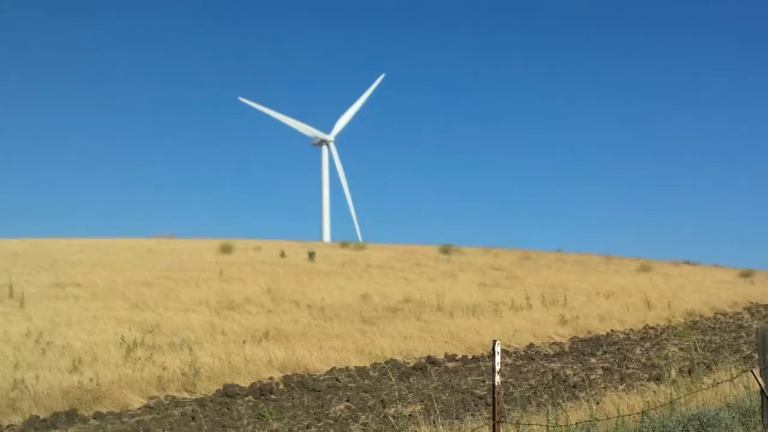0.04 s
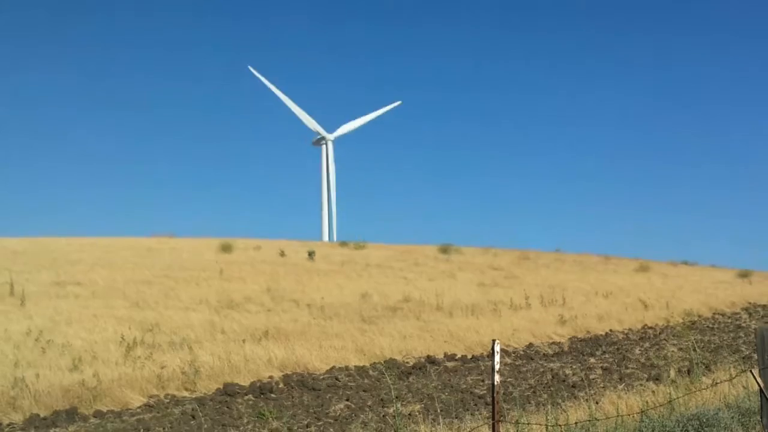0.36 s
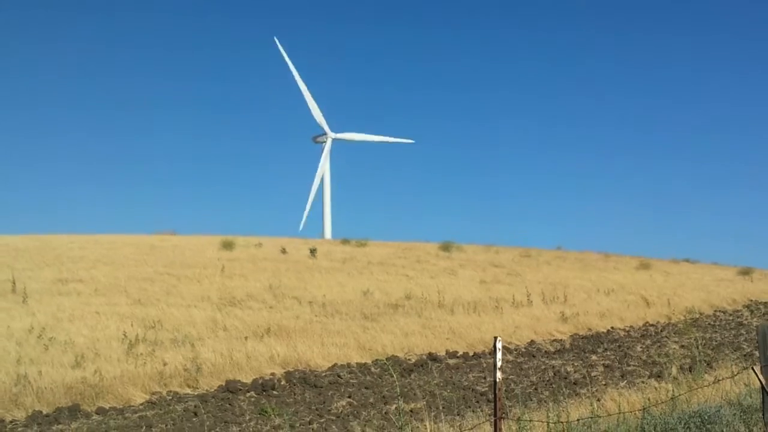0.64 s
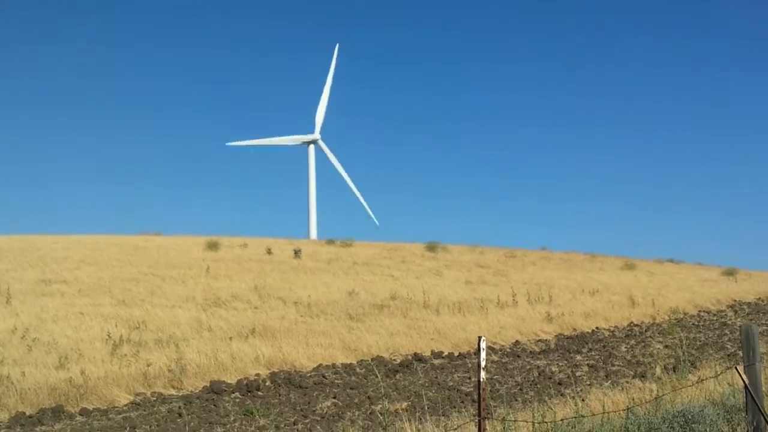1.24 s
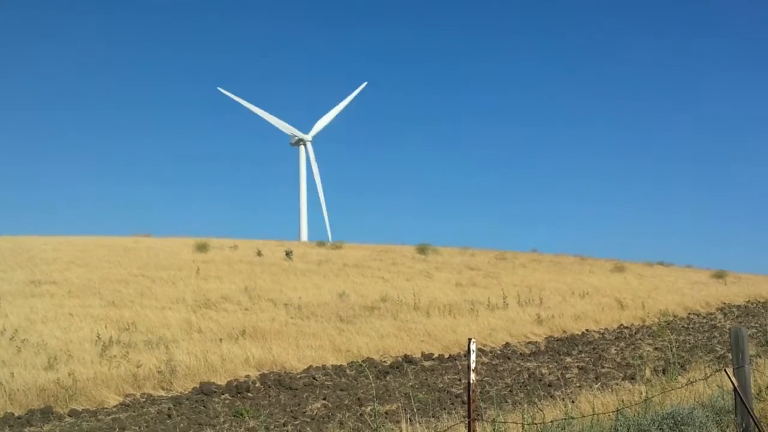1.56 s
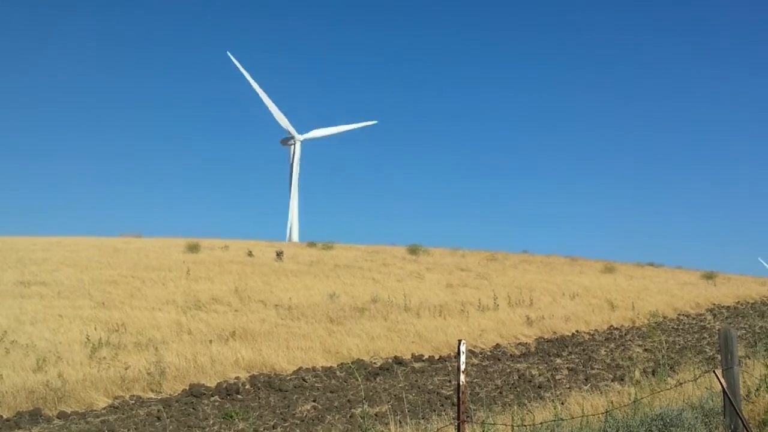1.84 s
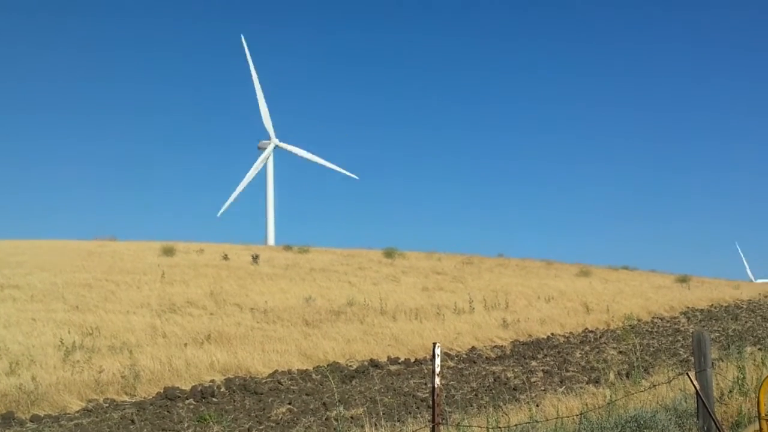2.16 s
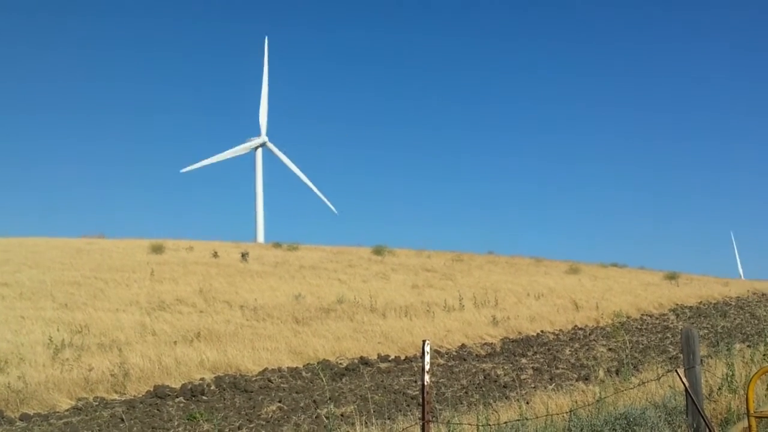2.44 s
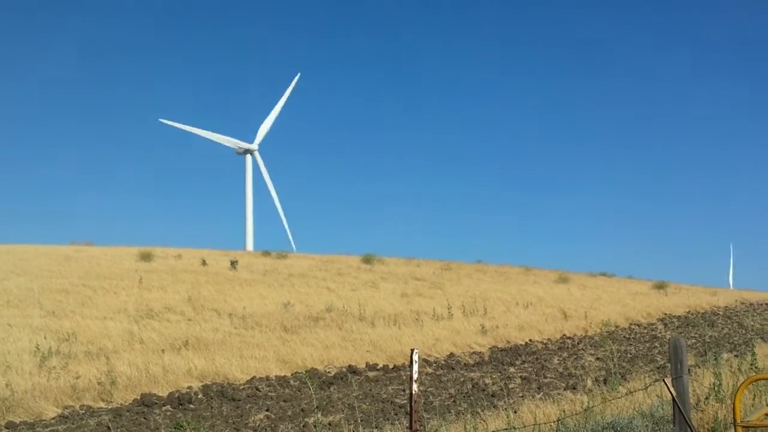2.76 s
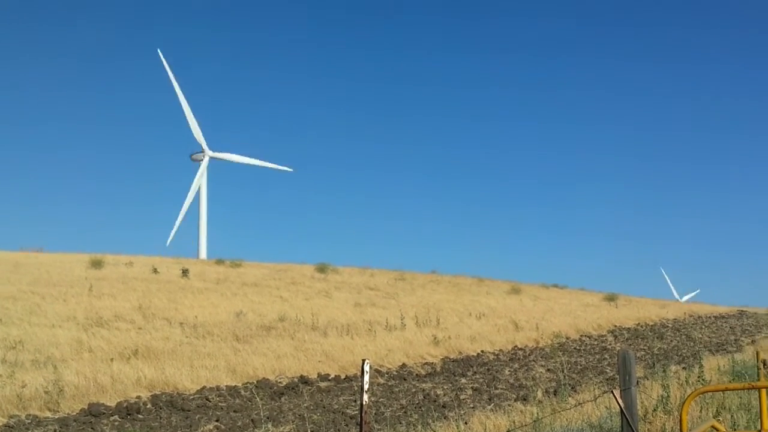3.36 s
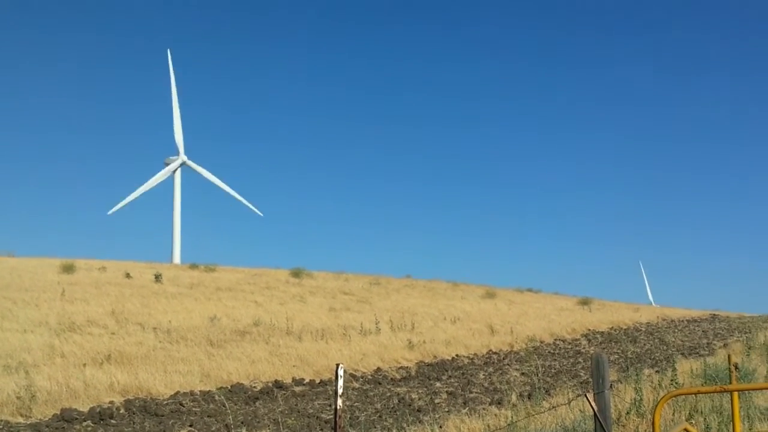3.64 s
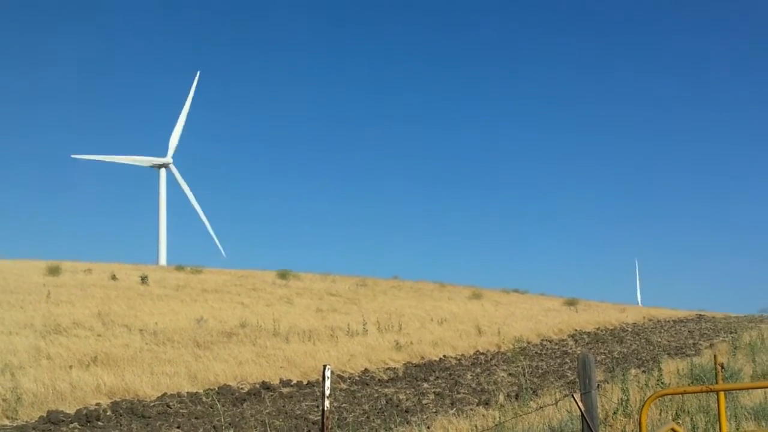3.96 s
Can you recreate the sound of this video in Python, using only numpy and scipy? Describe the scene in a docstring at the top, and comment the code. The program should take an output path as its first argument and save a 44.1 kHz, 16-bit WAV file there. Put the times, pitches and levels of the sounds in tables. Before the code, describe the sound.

Wind rumbles against the microphone in irregular gusts, with occasional sharp bumps.

```python
"""A dull, gusty rumble cuts in, drops out for an instant with a click, then stays: wind on an open
hillside, blowing across the two ports of a hand-held microphone. Each port has its own turbulence,
which grows louder and brighter with every buffet until it overloads the input and crackles. Slow eddies
swell the low end, a few sharp knocks sound in the wind, and a faint steady hiss lies underneath."""
import sys
import numpy as np
from scipy import signal
from scipy.fft import rfft, irfft
from scipy.io import wavfile
from scipy.ndimage import uniform_filter1d

SR = 44100
rng = np.random.default_rng(int(sys.argv[2]) if len(sys.argv) > 2 else 0)


def to_wav(s):
    """Save 16-bit WAV."""
    ch = np.atleast_2d(s).T  # columns
    pcm = np.round(np.clip(ch, -1, 1) * 32767)  # PCM
    wavfile.write(sys.argv[1], SR, pcm.astype(np.int16))


N = 176400

# The wind bed between buffets. Each row: time in seconds, left and right strength in dB.
WIND_BED = [(0.101,-20,-20.5), (0.221,-13,-6.5), (0.35,-15.5,-13.5), (0.6,-10.5,-17), (0.8,-12.5,-10.5),
            (0.971,-30,-13.5), (1.08,-19,-4.5), (1.2,-10.5,-4.5), (1.299,-24,-21), (1.45,-19,-16.5),
            (1.598,-7,-18), (1.742,-19.5,-20.5), (1.899,-6.5,-19.5), (2.05,-14,-20), (2.3,-16.5,-13),
            (2.45,-11,-18), (2.66,-28,-24), (2.802,-21.5,-5.5), (2.95,-10.5,-11.5), (3.101,-15,-11.5),
            (3.301,-4.5,-2.5), (3.429,-24.5,-22.5), (3.53,-18.5,-17), (3.68,-12.5,-11.5),
            (3.801,-17.5,-11.5), (4.0,-14.5,-26)]
# Eddies that hit the ports on top of that bed.
# Each row: centre in seconds, length in seconds, left and right boost in dB (negative for a lull).
BUFFET_EDDIES = [ (.118,0.023,13.5,5), (.182,0.036,11,14), (.249,0.036,-1,16.5), (.294,0.032,5,4.5),
                 (.42,0.048,8.5,3), (.474,0.01,6,7.5), (.503,0.063,1.5,1.5), (.555,0.022,6,-5),
                 (.575,0.024,1.5,10.5), (.661,0.015,-3.5,14), (.679,0.025,9,4), (.75,0.023,-1,0),
                 (.888,0.031,15,6.5), (.952,0.04,23,2.5), (1.035,0.091,23,2.5), (1.18,0.027,-3,8.5),
                 (1.246,0.024,0,11), (1.312,0.064,3,9.5), (1.376,0.035,15,2.5), (1.535,.022,9.5,11.5),
                 (1.598,.012,5,7), (1.623,0.037,7.5,5.5), (1.8,0.021,-11,7.5), (1.855,0.053,-1,9.5),
                 (1.909,0.0052,8,10), (1.994,0.018,-10,32.5), (2.066,0.033,0.5,13), (2.131,0.013,1.5,11.5),
                 (2.175,0.031,-4,11.5), (2.241,0.025,7,-1), (2.292,0.015,4.5,5), (2.376,0.034,7.5,5.5),
                 (2.411,0.0085,17,11.5), (2.44,0.032,2,10), (2.494,0.044,4,16.5), (2.549,0.032,12.5,7),
                 (2.635,0.11,14.5,12.5), (2.735,0.097,17,9.5), (2.797,0.018,15.5,1.5), (2.853,0.056,9,9.5),
                 (2.888,0.0084,11,5), (3.008,0.016,6,11), (3.104,0.049,10.5,3.5), (3.122,0.0053,16,6),
                 (3.166,0.0077,6.5,15), (3.211,0.01,4.5,12.5), (3.236,0.0076,-12,8), (3.255,0.075,-3,14),
                 (3.277,0.011,3.5,5), (3.324,0.024,3.5,7.5), (3.402,0.071,9,24.5), (3.435,0.057,17.5,6.5),
                 (3.473,0.062,0.5,14), (3.549,0.038,7,7.5), (3.598,0.022,12.5,-7), (3.627,0.047,4.5,7),
                 (3.748,0.034,3.5,7.5), (3.79,0.11,12,3), (3.877,0.021,-6,15.5), (3.936,0.063,5.5,13.5)]
# Large slow eddies that swell only the low end.
# Each row: centre in seconds, length in seconds, left and right boost in dB.
THUMP_EDDIES = [(.27,0.11,1,3.5), (.5,0.066,-1,10), (.882,0.045,5.5,-12), (1.165,0.032,-3,8),
                (2.18,0.033,13,4.5), (2.27,0.22,-1.5,6.5), (2.65,0.059,-4,7.5), (2.92,0.22,8,5.5),
                (3.008,0.071,6,8), (3.08,0.094,4,4.5), (3.3,0.096,-4,12.5), (3.42,0.078,-2,0.5),
                (3.615,.06,-7,6.5), (3.83,0.063,7,11), (3.95,0.064,-1,4)]
# Tone of the turbulence before its treble rolls off.
# Each row: frequency in Hz, left and right relative level in dB.
TURBULENCE_EQ = [(10, -1.5, -12), (24, -12, -3.5), (55, -3, 0.5), (123.5, -2.5, 3), (264, 0.5, 1.5),
                 (562, -0.5, -3.5), (1044, -3.5, -14), (2000, -10, -17), (5000, -3, -2)]
# Tone of the hiss. Each row: frequency in Hz, relative level in dB.
HISS_EQ = [(100, 3.5), (1000, 6), (2200, -4), (4200, -3.5), (5800, 0), (7200, 0), (9000, -4.5),
           (12000, -7.5), (15000, -11)]
# A click as the sound drops out, then a few sharp knocks in the wind.
# Each row: start in seconds, length of the spike in seconds, left and right gain in dB.
CLICK_AND_KNOCKS = [(.1235, 0.00065, 1, -7), (0.473, .0012, -3.5, -6), (2.168, 0.003, -25, -9.5),
                    (3.587, 0.00099, -11, -22)]
# Stretches where the sound gets through. Each row: start in seconds, end in seconds.
GATE_OPEN = [(.104, .125), (.147, 4.1)]

REFERENCE_DB = -12  # wind strength at which the next two settings hold
PORT_TRIM_DB = -1.5, 0.  # sensitivity, left and right
ROLLOFF_HZ = 261, 240.  # the treble falls by 1/e over this span, left and right
BRIGHTEN_OCT_PER_DB = 0.1211  # stronger wind makes smaller, quicker eddies
BRIGHTEN_LIMIT_DB = 19  # the brightening levels off this far above the reference
SPREAD = 0.27  # brighter wind spreads its energy over a wider band
BASS_HZ, BASS_FOLLOW = 136, .7  # the deep rumble follows the buffets less closely
THUMP_HZ = 119  # thumps fade out above this
FLUTTER_DB, FLUTTER_HZ = 2.68, 86.4  # quick random unsteadiness of the flow
LEAN = 0.067  # an eddy rises faster than it falls, by this share of its length
HISS_DB = -49
SPIKE_RISE_S = 0.00015
CEILING_DB, KNEE_HARDNESS, HIGH_CUT_HZ = 9, 10, 14900


def amp(db):
    """Decibels to gain."""
    return 10 ** (np.asarray(db) / 20)


def eq_gain(curve, hz, column=1):
    """Gain of an EQ curve, its dB points joined on a log-frequency axis."""
    columns = np.transpose(curve)
    return amp(np.interp(np.log(hz + 1), np.log(columns[0] + 1), columns[column]))


def stereo_noise(gain):
    """Independent noise for each port at rms 1, with gain(hz) as its spectrum."""
    hz = np.fft.rfftfreq(N, 1 / SR)
    noise = irfft(rfft(rng.standard_normal((2, N))) * gain(hz), N)
    return noise / np.sqrt(np.mean(noise ** 2, -1, keepdims=True) + 1e-20)


def eddy_swells_db(eddies):
    """Each passing eddy rides the level at the ports up or down in a leaning bell curve."""
    t, level_db = np.arange(N) / SR, np.zeros((2, N))
    for centre, length, *boost_db in eddies:
        near = abs(t - centre) < 2 * length
        since = t[near] - centre
        width = length * (1 + LEAN * np.sign(since))
        level_db[:, near] += np.outer(boost_db, np.exp(-(2 * since / width) ** 2))
    return level_db


def wind_strength_db():
    """How hard the air hits each port: the slow bed, buffets and random flutter."""
    times, *ports_db = np.transpose(WIND_BED)
    bed_db = np.array([np.interp(np.arange(N) / SR, times, port) for port in ports_db])
    flutter = stereo_noise(lambda hz: hz / FLUTTER_HZ * np.exp(-(hz / FLUTTER_HZ) ** 2))
    return bed_db + eddy_swells_db(BUFFET_EDDIES) + FLUTTER_DB * flutter


def wind_rumble(band_count=20):
    """Eddies of all sizes press on each port; the small, bright ones only appear as the wind rises."""
    excess_db = wind_strength_db() - REFERENCE_DB
    thump_db = eddy_swells_db(THUMP_EDDIES)
    hz, centres_hz = np.fft.rfftfreq(N, 1 / SR), np.geomspace(25, 5000, band_count)
    rolloff_hz = np.array(ROLLOFF_HZ)[:, None]
    tone = np.array([eq_gain(TURBULENCE_EQ, hz, column) for column in (1, 2)])
    tone /= np.sqrt(np.mean((tone * np.exp(-hz / rolloff_hz)) ** 2, 1, keepdims=True))
    spectrum = rfft(rng.standard_normal((2, N))) * tone
    brighten_db = np.minimum(excess_db, BRIGHTEN_LIMIT_DB * np.tanh(excess_db / BRIGHTEN_LIMIT_DB))
    widen = 2 ** (BRIGHTEN_OCT_PER_DB * brighten_db)
    rumble = np.zeros((2, N))
    for centre, solo in zip(centres_hz[:-1], np.eye(band_count)):
        band = irfft(spectrum * np.interp(hz, centres_hz, solo), N)  # triangular band-pass
        follow = 1 - (1 - BASS_FOLLOW) / (1 + (centre / BASS_HZ) ** 2)
        thump_share = np.exp(-(centre / THUMP_HZ) ** 2 / 2)
        treble_loss = np.exp(-centre / (rolloff_hz * widen))
        rumble += band * amp(follow * excess_db + thump_share * thump_db) * treble_loss
    port_gain = amp(REFERENCE_DB + np.array(PORT_TRIM_DB))[:, None]
    return rumble / widen ** SPREAD * port_gain


def hiss():
    """A faint, even floor of noise under the wind."""
    return amp(HISS_DB) * stereo_noise(lambda hz: eq_gain(HISS_EQ, hz))


def click_and_knocks():
    """The dropout's click, then knocks in the wind: each a quick spike with a shallow undershoot."""
    t, hits = np.arange(N) / SR, np.zeros((2, N))
    for start, length, *gain_db in CLICK_AND_KNOCKS:
        since = np.maximum(t - start, 0)
        attack = 1 - np.exp(-(since / SPIKE_RISE_S) ** 2)
        fall = (1 - since / length) * np.exp(-since / length)
        hits += np.outer(amp(gain_db), attack * fall)
    return hits


def scene():
    """The stereo mix: wind, hiss, click and knocks."""
    return wind_rumble() + hiss() + click_and_knocks()


def record(dry):
    """A gate cuts the sound in, overload flattens the strongest peaks, and a high cut trims the top."""
    t = np.arange(N) / SR
    is_open = sum(1. * ((t > start) & (t < end)) for start, end in GATE_OPEN)
    gate = uniform_filter1d(is_open, size=24)  # half-millisecond fades
    overloaded = dry / (1 + abs(dry / amp(CEILING_DB)) ** KNEE_HARDNESS) ** (1 / KNEE_HARDNESS)
    high_cut = signal.firwin(255, HIGH_CUT_HZ, window=("kaiser", 8), fs=SR)
    return signal.oaconvolve(gate * overloaded, high_cut[None], "same")


dry = scene()
out = record(dry)
to_wav(out)
```